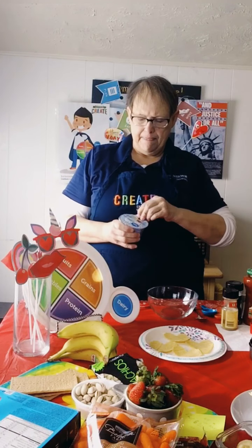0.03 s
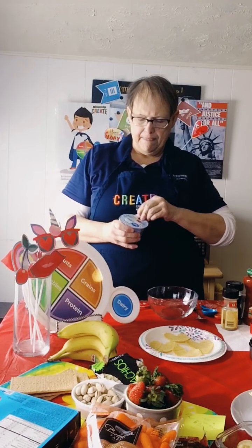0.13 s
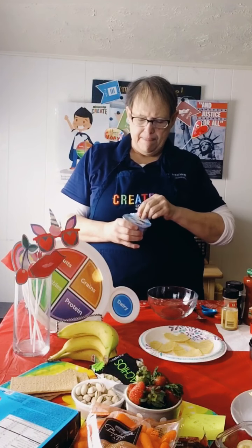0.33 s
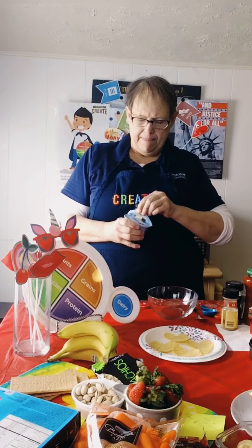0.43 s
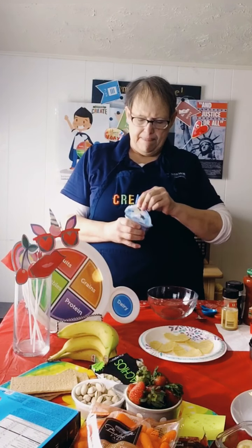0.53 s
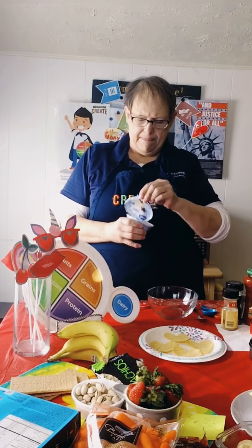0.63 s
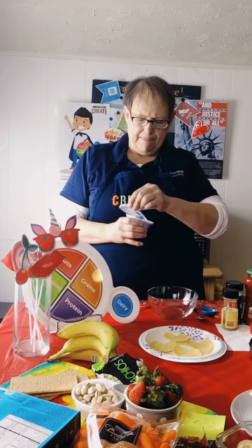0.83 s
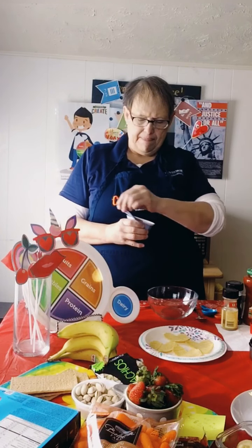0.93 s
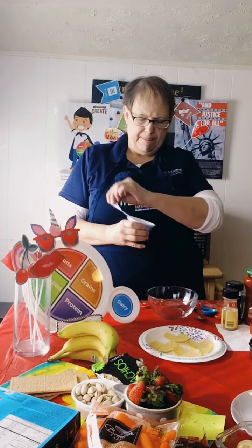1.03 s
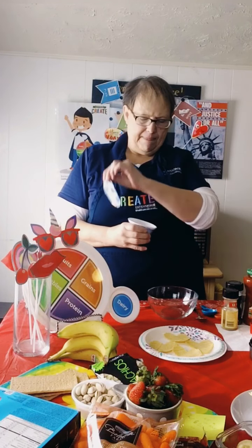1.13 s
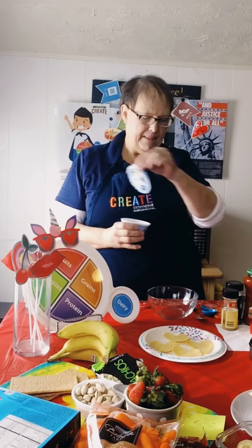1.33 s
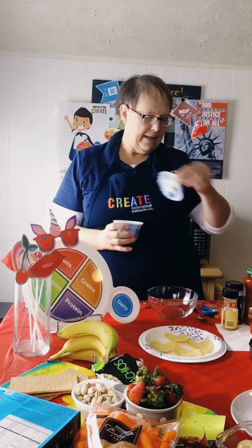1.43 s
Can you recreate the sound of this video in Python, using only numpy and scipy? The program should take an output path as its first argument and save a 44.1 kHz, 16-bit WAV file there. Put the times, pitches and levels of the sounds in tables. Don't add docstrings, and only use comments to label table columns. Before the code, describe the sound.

A foil lid is peeled from a small plastic cup, heard close in a quiet room with faint hum. Barely audible ticks come first, then hollow pops at 0.2-0.33 s as the tab loosens. Dense glue crackle tears in three pulls from 0.28 to 0.74 s, the last brighter, with a brief creak and low flaps. After near quiet, loose foil rustles and flicks around 0.95-1.16 s.

```python
import sys
import numpy as np
from scipy import signal
from scipy.fft import rfft, irfft
from scipy.io import wavfile
from scipy.ndimage import uniform_filter1d

SR = 44100
rng = np.random.default_rng(int(sys.argv[2]) if len(sys.argv) > 2 else 0)


def voltage_ratio(level):
    return 10 ** (np.asarray(level, float) / 20)


def store_wav(level_fs):
    pcm = np.round(np.clip(np.atleast_2d(level_fs), -1, 1) * 32767)
    wavfile.write(sys.argv[1], SR, pcm.T.astype(np.int16))


N = 66150
LEAD_SAMPLES = 4410

# frequency in Hz, level in dB.
AIR_SPECTRUM = [(15, -37), (25, -0.5), (332, -4.5), (390, -9), (434, -9.5), (1110, -19), (1270, -15.5),
                (1460, -21.5), (15600, -36)]
# frequency in Hz, level in dB rms.
HUM_TONES = [(193.8, -72), (290.7, -68.5), (387.6, -68), (1308, -71)]
# start in s, length in s, level in dB, low cut in Hz, high cut in Hz.
FOIL_RUSTLES = [(-0.06, 0.044, -45, 690, 4900), (0.206, 0.009, -54, 1420, 2500),
                (0.267, 0.009, -43.5, 3010, 14860), (0.939, 0.0057, -58.5, 5100, 15000),
                (0.951, 0.012, -58, 5130, 12000), (0.963, .018, -64, 4470, 10000),
                (1.006, .012, -60.5, 3500, 12100), (1.03, 0.036, -57, 1000, 2280),
                (1.061, 0.024, -53.5, 2970, 15100), (1.08, 0.1, -58, 600, 14000),
                (1.13, 0.015, -52.5, 2500, 15000), (1.1395, 0.0056, -34, 1470, 6900),
                (1.146, 0.0096, -35, 1010, 12200), (1.161, 0.003, -41, 2000, 8000),
                (1.469, 0.009, -65, 4100, 14000)]
# frequency in Hz, level in dB per Hz.
SNAP_SPECTRUM = [(150, -60.5), (250, -24), (604, -12.5), (730, -9), (1290, -7), (2630, -10.5), (3230, -8),
                 (5820, -11.5), (15600, -23)]
# frequency in Hz, width in Hz, level in dB.
FOIL_MODES = [(2060, 120, -8.5), (2820, 75, 6), (3240, 190, 2), (3510, 51, -5.5), (4350, 100, -8),
              (5160, 200, 4), (5830, 150, -6.5), (7000, 360, 0.5)]
# start in s, peak in dB, pitch in Hz, t60 in s.
LID_POPS = [(0.041, -55.5, 1270, 0.064), (0.086, -55.5, 1253, 0.034), (0.092, -53.5, 1290, .03),
            (0.2202, -22.5, 1290, 0.036), (0.2245, -19.5, 1277, 0.055), (0.233, -26, 1342, 0.024),
            (0.246, -39, 1260, 0.022), (0.258, -37.5, 1300, 0.041), (0.296, -24.5, 773, 0.036),
            (0.319, -23, 1290, 0.013), (0.324, -15, 1263, 0.052), (0.6215, -19.5, 1480, 0.032),
            (0.629, -19, 1470, 0.048)]
# time in s, tearing effort in dB, share ringing the cup in dB,
# brightness in dB per octave.
SEAL_PULLS = [
    [(0.279, -27, 0, -0.2), (0.289, -21.5, -5.5, -0.6), (0.329, -30.5, 0, -1), (0.35, -32.5, -6.5, -8)],
    [(0.444, -34.5, 2, -0.4), (0.484, -30, 1, 0.01), (0.5, -32.5, 10, 0.3), (0.526, -29, -0.5, -0.5),
     (0.572, -36, 13, -1.8), (0.612, -34.5, 5.5, 0.01)],
    [(0.622, -29.5, 7.5, 0.6), (0.662, -34, -0.5, 1.7), (0.68, -28, -8, 0.9), (0.706, -35, 0.5, 1.2),
     (0.724, -33.5, -24.5, 0.3), (0.74, -39, -7, -0.6)],
]
# frequency in Hz, width in Hz, level in dB.
CUP_MODES = [(420, 105, -9.5), (762, 71, -1.5), (1109, 80, -5.5), (1290, 30, 1), (1470, 60, 1),
             (1662, 65, 3.5), (1818, 74, -1.5), (2090, 110, -13)]
# time in s, slip rate in Hz, level in dB.
SEAL_CREAK = [(0.292, 360.7, -58), (0.30, 364.3, -49), (0.34, 329.8, -30), (0.359, 329.3, -59),
              (0.449, 329, -54), (0.491, 410.3, -49), (0.52, 420, -34), (0.561, 400, -37), (0.6, 420, -40),
              (0.641, 397, -46), (0.7, 400, -58)]
# start in s, peak in dB, pitch in Hz, t60 in s.
LOW_FLAPS = [
    (0.466, -37, 290, 0.048),
    (0.505, -29.5, 386, 0.043),
    (0.534, -41, 480, 0.043),
    (0.63, -39, 329, 0.075),
    (0.689, -34, 490, 0.086),
    (0.711, -42, 153, 0.095),
    (1.04, -47, 290, 0.084),
    (1.111, -49, 287, 0.058),
    (1.143, -51, 149, 0.12),
]
# frequency in Hz, t60 in s.
ROOM_DECAY = [(200, 0.28), (1000, 0.26), (4000, 0.29), (9000, 0.27), (15000, 0.18)]


def clock():
    return (np.arange(N + LEAD_SAMPLES) - LEAD_SAMPLES) / SR


def rms_one(x):
    return x / np.sqrt(np.mean(x ** 2) + 1e-20)


def butter(x, order, hz, kind="band"):
    return signal.sosfilt(signal.butter(order, hz, kind, fs=SR, output="sos"), x)


def smooth_noise(samples):
    return rms_one(uniform_filter1d(rng.standard_normal(N + LEAD_SAMPLES), samples))


def at_hz(points, hz):
    table_hz, value = np.array(points).T
    return np.interp(np.log(hz), np.log(table_hz), value)


def colour(x, spectrum):
    hz = np.maximum(np.fft.rfftfreq(len(x), 1 / SR), 1)
    return irfft(rfft(x) * voltage_ratio(at_hz(spectrum, hz)), len(x))


def background():
    t = clock()
    out = voltage_ratio(-62) * rms_one(colour(rng.standard_normal(len(t)), AIR_SPECTRUM))
    for hz, db in HUM_TONES:
        sway_db = 1.1 * smooth_noise(2000)
        out = out + voltage_ratio(db + 4 + sway_db) * np.sin(2 * np.pi * (hz * t + rng.random()))
    return out


def resonate(x, modes):
    out = 0
    for k, (hz, width_hz, db) in enumerate(modes):
        r = np.exp(-np.pi * width_hz / SR)
        poles = [1, -2 * r * np.cos(2 * np.pi * hz / SR), r * r]
        out = out + (-1) ** k * voltage_ratio(db) * signal.lfilter([1 - r * r, 0, r * r - 1], poles, x)
    return out


def snaps():
    snaps_per_s, spread_db = 6000, 3.5
    size = N + LEAD_SAMPLES
    heights = voltage_ratio(spread_db * np.minimum(rng.exponential(1, size), 4)) * rng.choice([-1, 1], size)
    struck = rng.random(size) < snaps_per_s / SR
    return rms_one(heights * struck + 1e-9)


def foil_voice():
    x = snaps()
    direct = rms_one(colour(x, SNAP_SPECTRUM))
    ring = rms_one(resonate(x, FOIL_MODES))
    return rms_one(direct + voltage_ratio(-3) * ring)


def rustles():
    attack_s = 0.0011
    t, out, voice = clock(), 0, foil_voice()
    for start_s, length_s, db, low_hz, high_hz in FOIL_RUSTLES:
        age = np.maximum(t - start_s, 0)
        fade_db = -4 * age / length_s - 3500 * np.maximum(age - length_s, 0)
        shape = np.minimum(age / attack_s, 1) * voltage_ratio(db + fade_db)
        out = out + butter(voice * shape, 2, [low_hz, high_hz])
    return out


def pops():
    overtone_ratio, overtone_db, overtone_fade = 2.58, -12, 1.2
    crack_db, crack_t60_s = -10, 0.022
    t, out, crackle = clock(), 0, foil_voice()
    for start_s, db, hz, t60_s in LID_POPS:
        age = np.maximum(t - start_s, 0)
        main = np.sin(2 * np.pi * hz * age)
        overtone = voltage_ratio(overtone_db - 60 * overtone_fade * age / t60_s) * np.sin(2 * np.pi * hz * overtone_ratio * age)
        crack = voltage_ratio(crack_db - 60 * age / crack_t60_s) * crackle * (age > 0)
        out = out + voltage_ratio(db) * (voltage_ratio(-60 * age / t60_s) * (main + overtone) + crack)
    return butter(out, 4, [500, 3970])


def octaves(x):
    hz = np.maximum(np.fft.rfftfreq(len(x), 1 / SR), 1)
    full, bands = rfft(x), []
    for centre_hz in 250 * 2 ** np.arange(7):
        weight = np.cos(np.pi / 2 * np.clip(np.log2(hz / centre_hz), -1, 1)) ** 2
        bands.append((centre_hz, irfft(full * weight, len(x))))
    return bands


def patch_db():
    depth_db, samples = 3.0, int(0.012 * SR)
    return depth_db * rms_one(uniform_filter1d(smooth_noise(samples), samples))


def tearing():
    t, tear, cup, tilt_db = clock(), 0, 0, 0
    for pull in SEAL_PULLS:
        s, effort_db, share_db, bright_db = np.transpose(pull)
        effort = voltage_ratio(np.interp(t, s, effort_db, left=-200, right=-200))
        tear = tear + effort
        cup = cup + effort * voltage_ratio(np.interp(t, s, share_db))
        tilt_db = tilt_db + np.interp(t, s, bright_db, left=0, right=0)
    foil = 0
    for hz, band in octaves(foil_voice()):
        foil = foil + band * voltage_ratio(tilt_db * np.log2(hz / 4000) + patch_db())
    shake = snaps()
    steady_level = np.std(resonate(shake, CUP_MODES))
    return voltage_ratio(-1.0) * tear * foil + voltage_ratio(-4) * resonate(cup * shake, CUP_MODES) / steady_level


def creak():
    rate_jitter, size_spread_db = 0.06, 7.5
    t, (s, hz, db) = clock(), np.transpose(SEAL_CREAK)
    rate_hz = np.interp(t, s, hz) * (1 + rate_jitter * smooth_noise(150))
    cycles = np.floor(np.cumsum(rate_hz) / SR)
    slips = np.diff(cycles, prepend=0) * voltage_ratio(size_spread_db * rng.standard_normal(len(t)))
    direct = rms_one(butter(slips, 2, [280, 1900]))
    body = rms_one(direct + voltage_ratio(-1.0) * rms_one(resonate(slips, CUP_MODES)))
    return body * voltage_ratio(np.interp(t, s, db, left=-200, right=-200))


def flaps():
    rise_s = 0.0025
    t, out = clock(), 0
    for start_s, db, hz, t60_s in LOW_FLAPS:
        age = np.maximum(t - start_s, 0)
        shape = voltage_ratio(db - 60 * age / t60_s) * (1 - np.exp(-age / rise_s))
        out = out + shape * np.sin(2 * np.pi * hz * age)
    return out


def room(x):
    echo_db, first_echo_s = -6.5, 0.0042
    age, tail = np.arange(SR // 2) / SR, 0
    edges_hz = 100 * 2 ** np.arange(0, 7.6, 0.5)
    white = rng.standard_normal((2, len(age)))
    for k, (low_hz, high_hz) in enumerate(zip(edges_hz, edges_hz[1:])):
        t60_s = at_hz(ROOM_DECAY, np.sqrt(low_hz * high_hz))
        tail = tail + butter(white[k % 2], 2, [low_hz, high_hz]) * voltage_ratio(-60 * age / t60_s)
    tail = tail * np.clip(age / first_echo_s - 1, 0, 1)
    return voltage_ratio(echo_db) * signal.fftconvolve(x, tail / np.sqrt(np.sum(tail ** 2)))[:len(x)]


def scene():
    thin = butter(rustles() + pops() + tearing() + creak(), 4, 254, "high")
    lid = thin + flaps()
    return (background() + lid + room(lid))[None, LEAD_SAMPLES:]


def band_limit(x):
    return signal.sosfilt(signal.butter(12, 15740, fs=SR, output="sos"), x)


def record(dry):
    mix = butter(dry, 3, 46.5, "high")
    return band_limit(mix)


dry = scene()
out = record(dry)
store_wav(out)
```